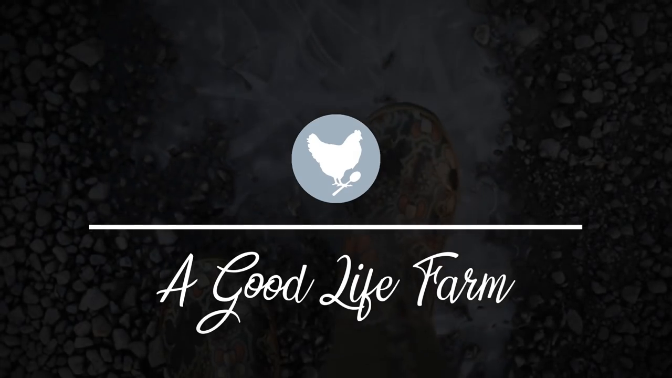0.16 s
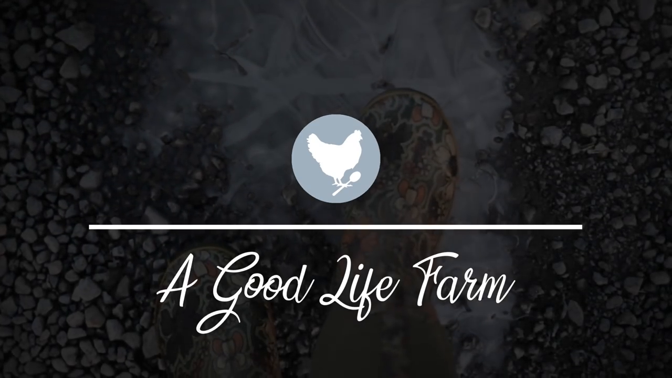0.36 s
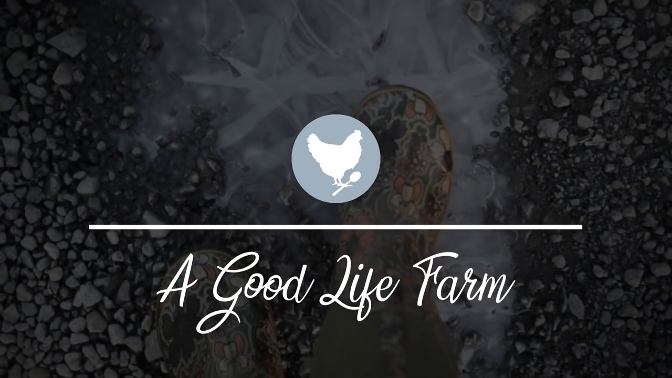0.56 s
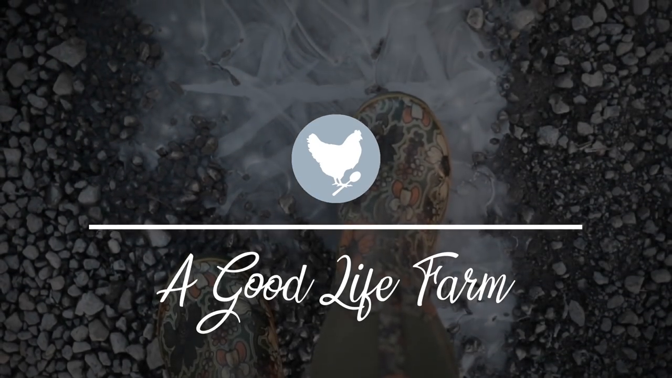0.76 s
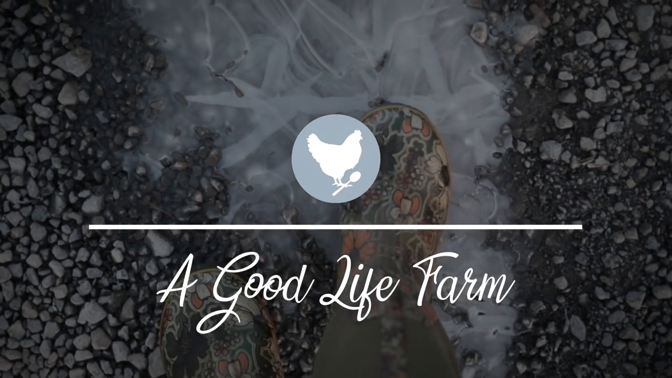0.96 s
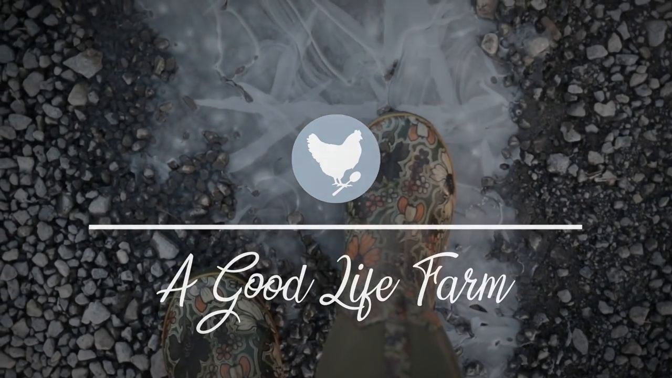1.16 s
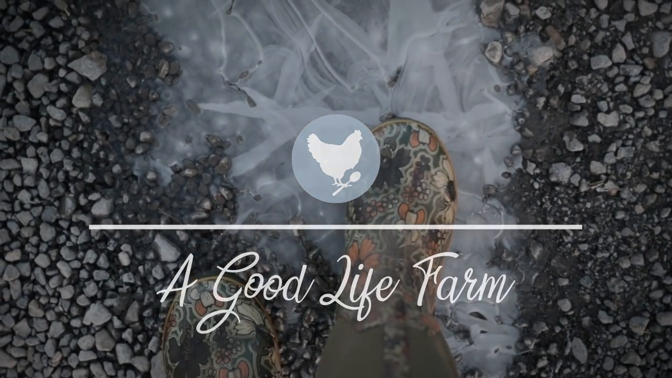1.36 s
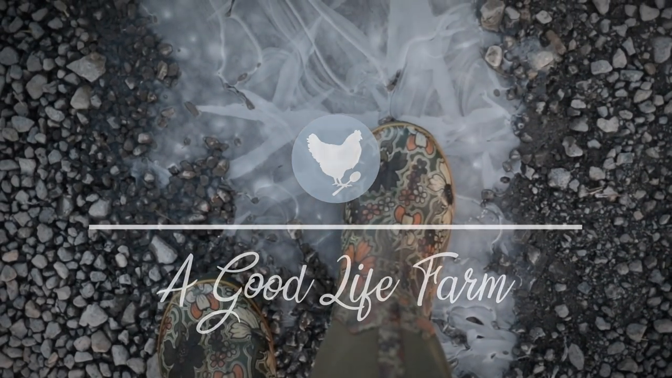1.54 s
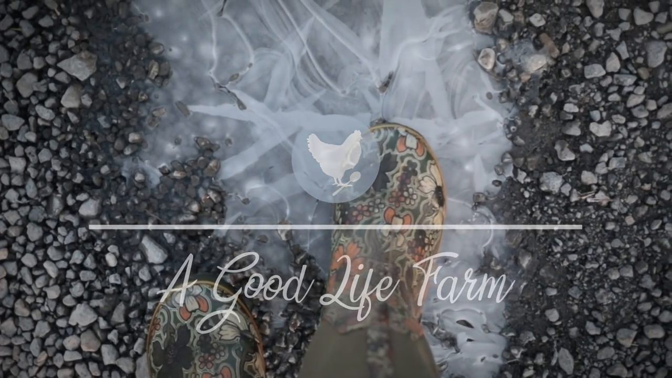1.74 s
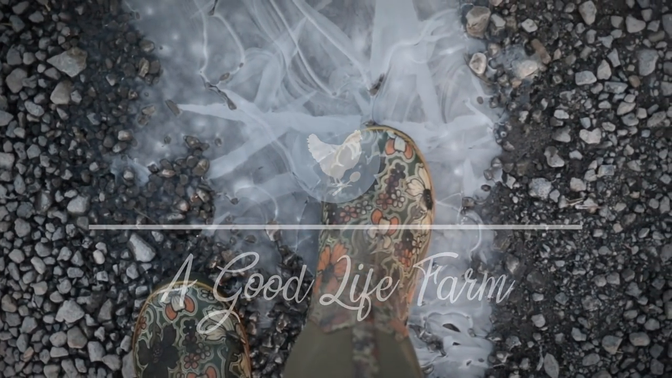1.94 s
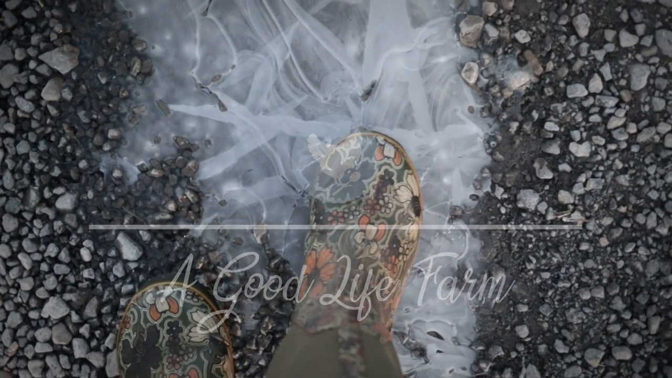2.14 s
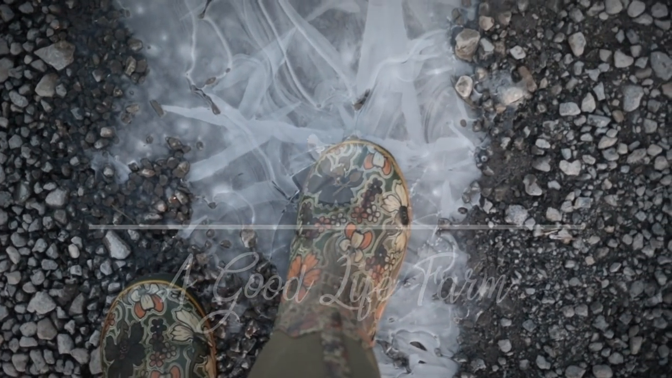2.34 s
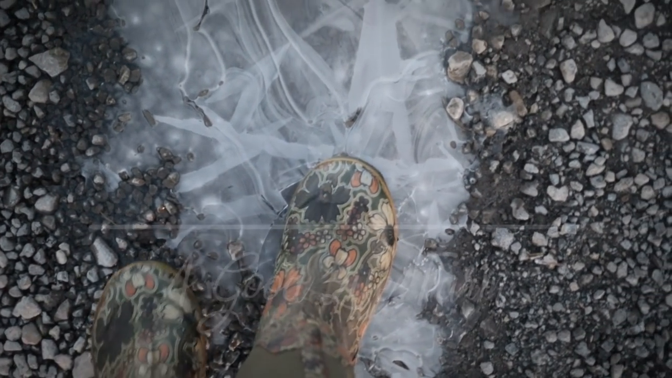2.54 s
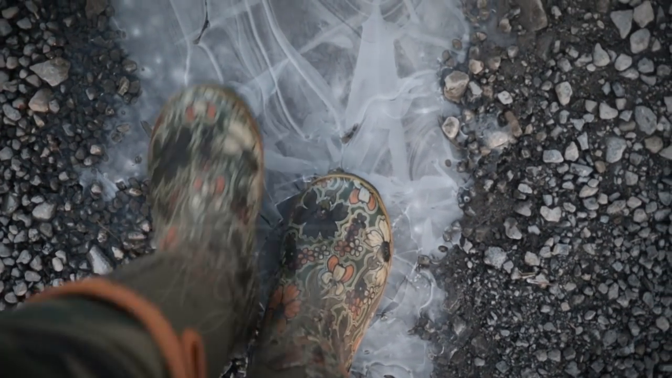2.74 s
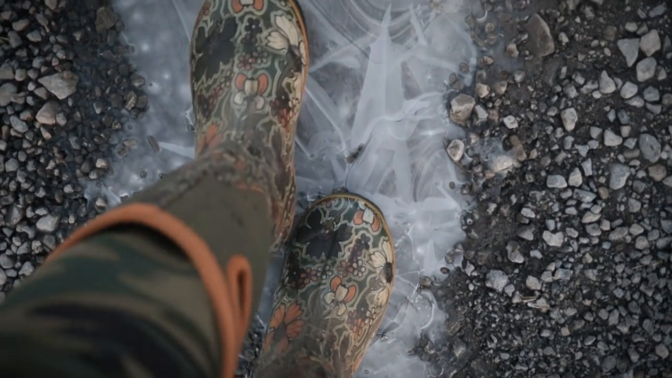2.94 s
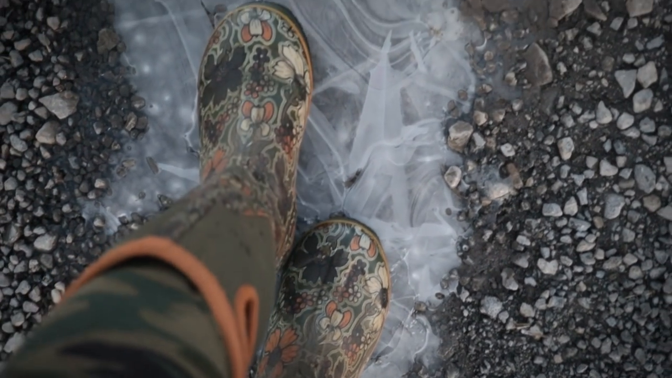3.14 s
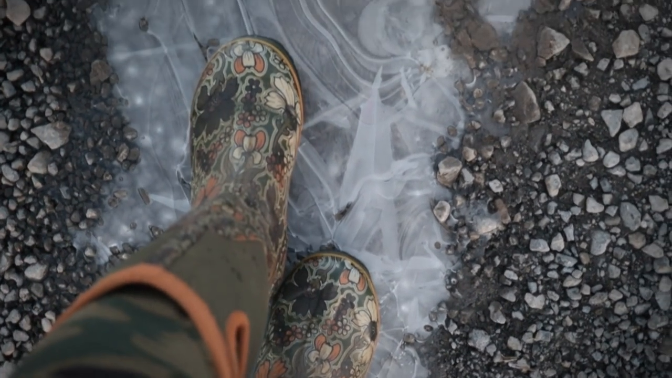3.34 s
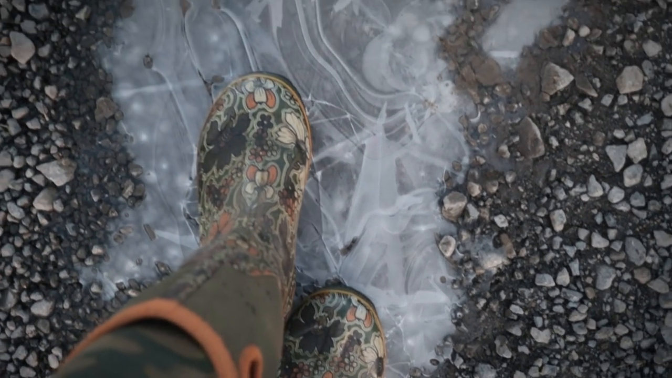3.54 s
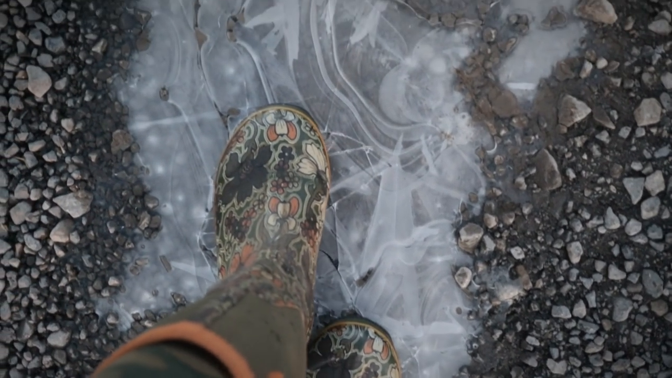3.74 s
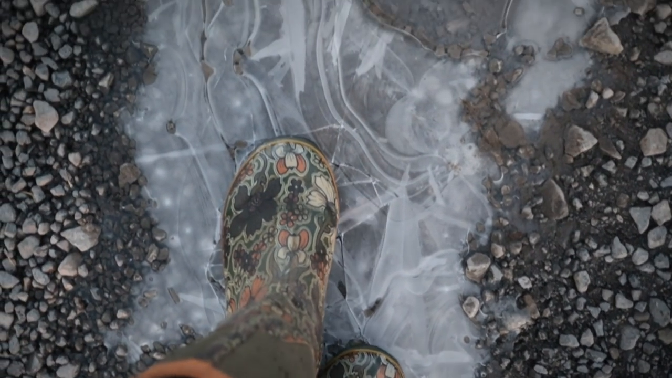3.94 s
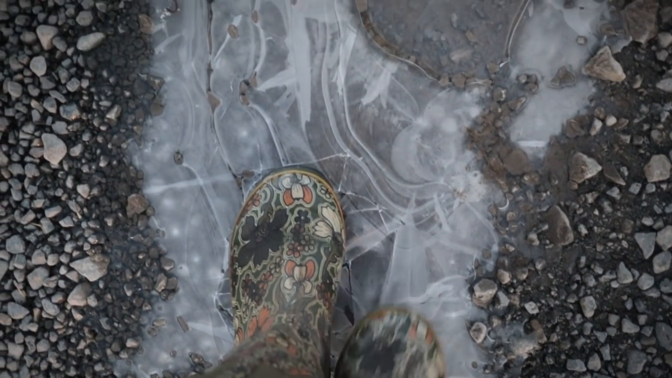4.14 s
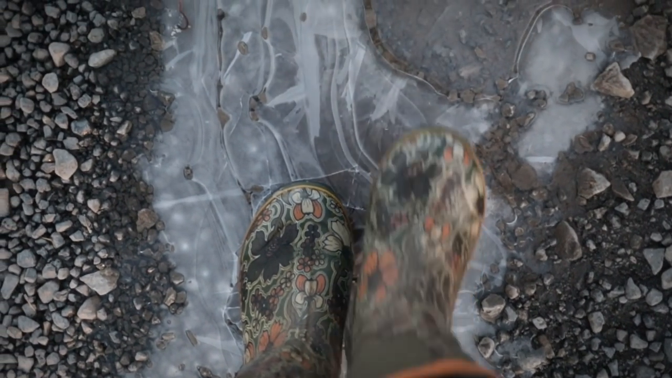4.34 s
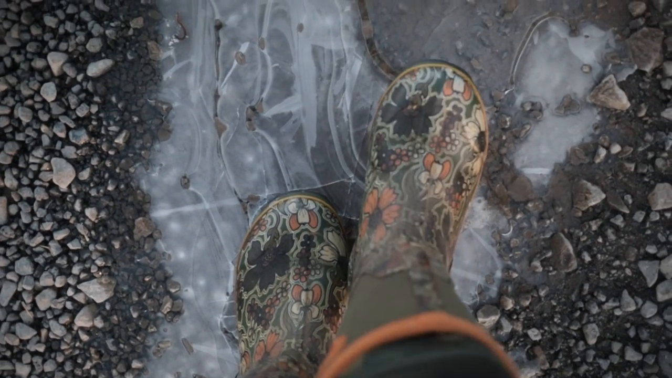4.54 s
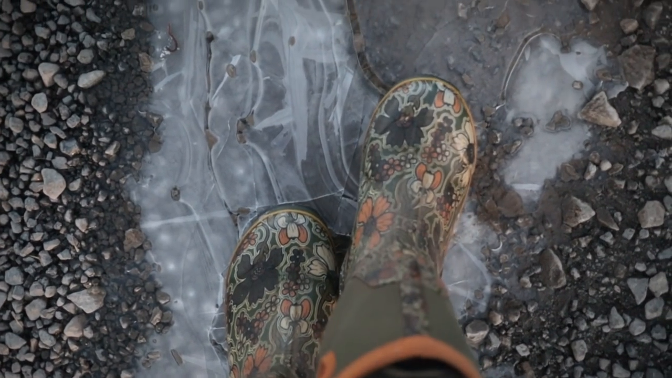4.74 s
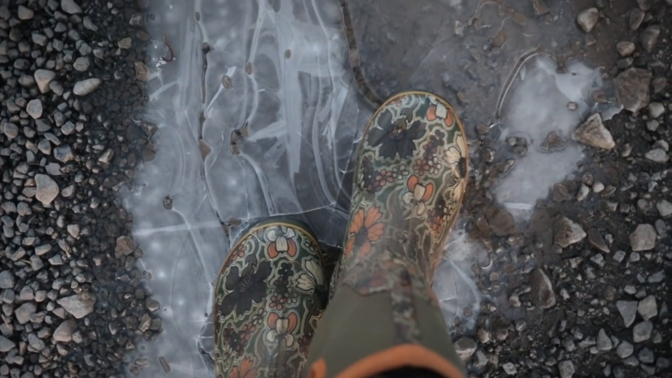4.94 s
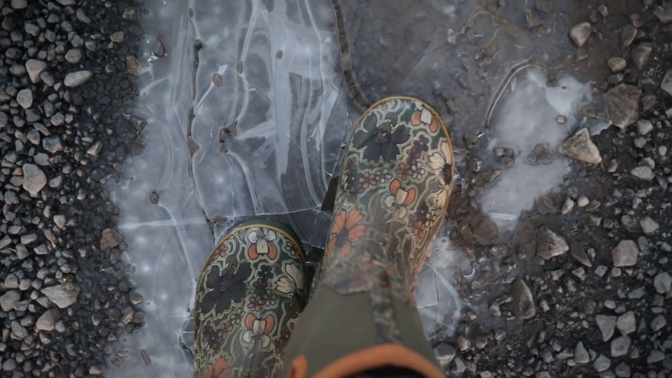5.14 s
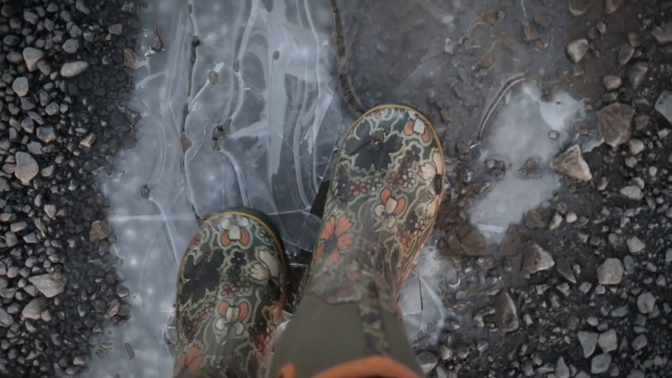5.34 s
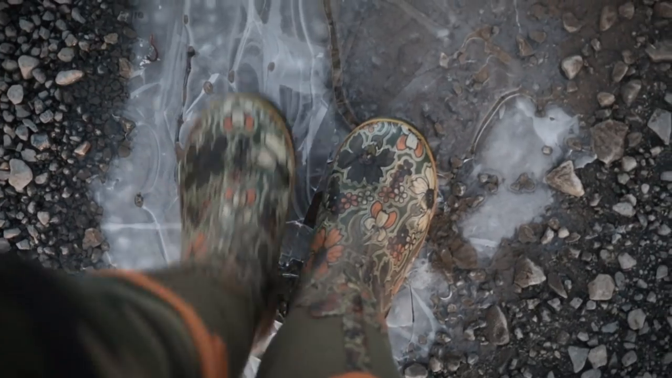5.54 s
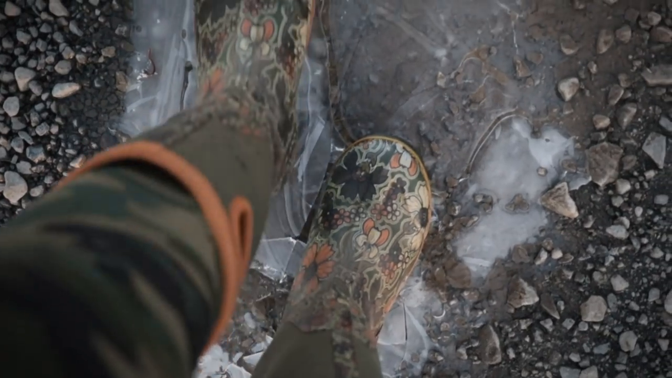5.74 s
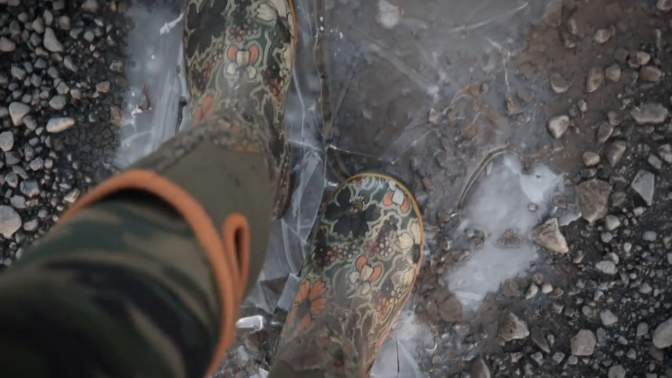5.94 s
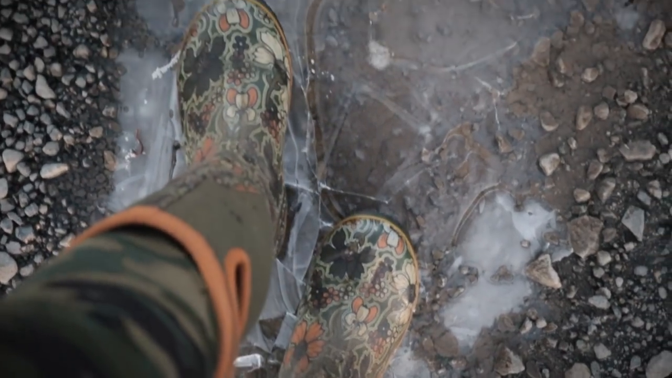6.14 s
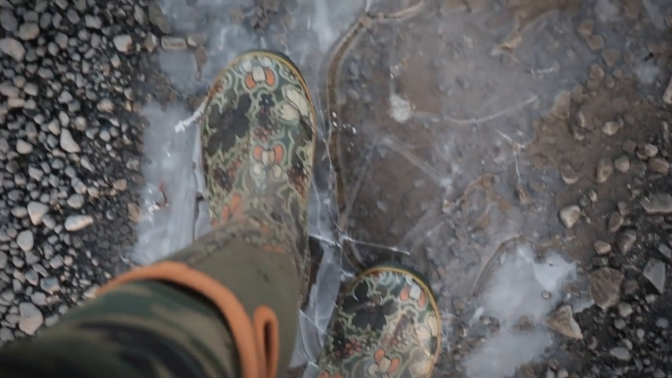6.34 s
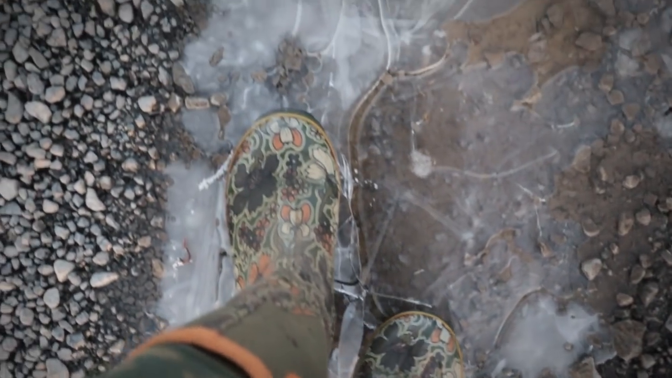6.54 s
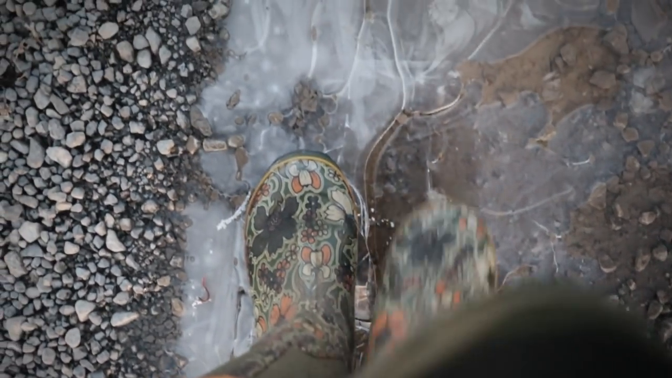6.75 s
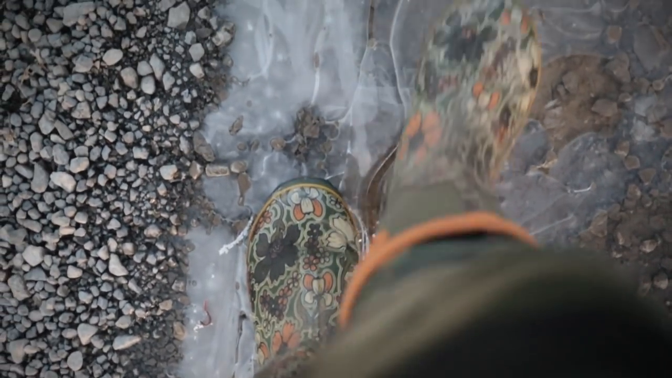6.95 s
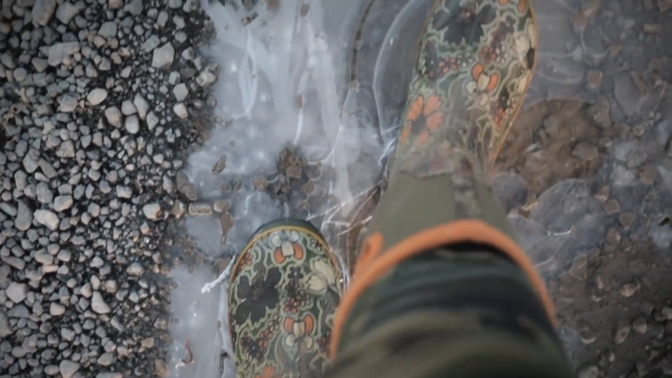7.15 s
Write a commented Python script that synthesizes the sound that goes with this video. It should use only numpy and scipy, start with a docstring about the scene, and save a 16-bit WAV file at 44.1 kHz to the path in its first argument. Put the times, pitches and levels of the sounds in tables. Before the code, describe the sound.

Quiet outdoor air with low rumble and faint hiss, a tiny thin whistle and a soft footfall jolt open the scene. From 0.3 s a rubber boot presses thin puddle ice: dense, bright, dry cracks over grainy crunching, strongest until 1.1 s, with brief sole scrapes, then thinning. Around 1.6 s the sheet gives way with hollower knocks and snaps, crackling on to 2.9 s. After a short gap, a hard crack at 3.1 s leads into the heaviest crunch, a rush of shards peaking near 3.45 s, fading into scattered snaps by 4.2 s. Another step crunches from 4.65 to 5.1 s, then only faint crumbling and a weak thin tone until 5.7 s. Breaks from 5.7 to 6.5 s sound glassy and brittle; sparse ticks and low thumps follow, and a sharp hollow crunch lands at 7.15 s, cut off at the end. Close and dry, the loudest cracks clipping.

```python
"""A frozen puddle over gravel, in quiet outdoor air: rubber boots step slowly on its thin ice.
Each sharp crack is a decaying plate ring in a noise burst, with a bright snap and a thud of the hollow beneath.
Cave-ins and pressing soles crumble the sheet: random small shards over a bed of grainy noise.
Under it lie rumble and hiss, two faint thin whistles (gliding sines), low jolts of the footfalls
and scrapes of the sole (band-shaped grainy noise); the loudest cracks clip."""
import sys
import numpy as np
from scipy import signal
from scipy.fft import rfft, irfft, next_fast_len
from scipy.io import wavfile
from scipy.ndimage import uniform_filter1d, map_coordinates

SR = 44100
rng = np.random.default_rng(int(sys.argv[2]) if len(sys.argv) > 2 else 0)


def volts(x):
    """Linear amplitude factor 10**(x/20) for a level x in dB, scalar or array-like."""
    e = np.asarray(x, float) / 20
    return 10 ** e


def transcribe(u):
    """Save the signal u as a 16-bit wav file named by the first command-line argument.

    u: samples, shape (n,) or (channels, n), limited to [-1, 1]; the rate is SR.
    q: integer samples, one column per channel.
    """
    v = np.clip(np.atleast_2d(u).T, -1, 1)
    q = np.round(v * 32767).astype(np.int16)
    wavfile.write(sys.argv[1], SR, q)


N = 317079


def unit(x):
    """Brings each row to rms 1."""
    return x / np.sqrt(np.mean(x ** 2, axis=-1, keepdims=True) + 1e-20)


def curves(rows):
    """Draws one value per sample for each column after the time."""
    s, *columns = np.transpose(rows)
    return [np.interp(np.arange(N) / SR, s, column) for column in columns]


def noise(spectrum):
    """Noise of rms 1, coloured by (frequency [Hz], density [dB per Hz]) points on a log axis."""
    m = next_fast_len(N)
    hz, db = np.transpose(spectrum)
    log_hz = np.log(np.fft.rfftfreq(m, 1 / SR) + 1)
    gain = volts(np.interp(log_hz, np.log(hz), db))
    return unit(irfft(rfft(rng.standard_normal(m)) * gain, m)[:N])


def grainy(x):
    """Breaks a steady noise into splinters a few milliseconds long by a random flutter of its level."""
    flutter_db = 3.5 * unit(uniform_filter1d(rng.standard_normal(N), size=90))
    return unit(x * volts(flutter_db))


# colour of the outdoor air: (frequency [Hz], density [dB per Hz])
AIR_COLOUR = [(30, -13), (145, 0), (245, -8.5), (300, -17), (1200, -21.5), (2200, -30.5), (16000, -43)]
# loudness of the air: (time [s], rms level [dB])
AIR_LEVEL = [(0, -46.5), (1.5, -56), (4.3, -57.5), (7.19, -64)]


def air():
    """Outdoor rumble and hiss: one coloured noise on a slow level curve."""
    return volts(curves(AIR_LEVEL)[0]) * noise(AIR_COLOUR)


# faint whistles, before their wavering:
# (start [s], end [s], start pitch [Hz], end pitch [Hz], start level [dB], loss by the end [dB])
WHISTLE_CUES = [(.145, .29, 3080, 3400, -60, 10), (5.46, 5.67, 875, 868, -48.5, 2)]


def whistles():
    """Thin gliding sines whose pitch and level waver together."""
    out = np.zeros(N)
    for start, end, from_hz, to_hz, db, loss_db in WHISTLE_CUES:
        n = round((end - start) * SR)
        waver = map_coordinates(rng.standard_normal(12), [np.linspace(0, 9, n)])
        glide = np.linspace(0, 1, n) ** 0.7  # moves fastest at the start
        hz = (from_hz + (to_hz - from_hz) * glide) * (1 + 0.003 * waver)
        level = volts(db - np.linspace(0, loss_db, n) + 2.7 * waver)
        tone = np.sin(2 * np.pi * np.cumsum(hz) / SR)
        out[round(start * SR):][:n] += level * signal.windows.tukey(n, 0.15) * tone
    return out


# footfalls and shifts of weight shake the ground: (time [s], level before the fade [dB])
JOLT_CUES = [(0.256, -42), (6.332, -37), (7.109, -36.5)]
# colour of their scuff: (frequency [Hz], density [dB per Hz])
SCUFF_COLOUR = [(60, -9), (130, 1), (400, -1), (900, -5), (2000, -53)]
JOLT_HZ, JOLT_T60_S = 89.5, 0.089
SCUFF_DB = 9.5  # rms of the scuff over the peak of the sine push


def jolts():
    """Low sine pushes with a dull noise scuff, both dying away together."""
    out = np.zeros(N + SR)
    t = np.arange(SR // 4) / SR
    scuff = np.pad(noise(SCUFF_COLOUR), (0, SR))
    for s, db in JOLT_CUES:
        at = round(s * SR)
        push = np.sin(2 * np.pi * JOLT_HZ * t) + volts(SCUFF_DB) * scuff[at:][:len(t)]
        envelope = volts(db - 60 * t / JOLT_T60_S) * (1 - np.exp(-t / 0.00088))
        out[at:][:len(t)] += envelope * push
    low_cut = signal.butter(2, 55, "highpass", fs=SR, output="sos")
    return signal.sosfilt(low_cut, out[:N])


# the rubber sole slides over ice and wet grit:
# (start [s], end [s], rms level before swell and low cut [dB], loudest pitch [Hz])
SCRAPE_CUES = [(0.726, 0.809, -27, 1250), (0.964, 1.062, -27, 2180), (1.064, 1.324, -37.5, 2320),
               (1.29, 1.475, -43, 6300), (2.523, 2.604, -32.5, 1410), (3.77, 3.928, -35.5, 1180),
               (5.214, 5.452, -42.5, 1410), (6.11, 6.284, -42.5, 3150)]
RASP_OCTAVES, SING_OCTAVES = 1.69, 0.14  # reach of each band to either side of the loudest pitch
SING_DB = -3  # spectral gain of the narrow singing band against the rasp


def scrapes():
    """Rasps: a broad band of gritty noise with a narrow band singing on top."""
    out, grit = np.zeros(N), grainy(rng.standard_normal(N))
    for start, end, db, loudest_hz in SCRAPE_CUES:
        span = slice(round(start * SR), round(end * SR))
        piece = grit[span]
        n = len(piece)
        octaves = np.log2((np.fft.rfftfreq(n, 1 / SR) + 1) / loudest_hz)
        rasp = 1 / (1 + (octaves / RASP_OCTAVES) ** 4)
        sing = volts(SING_DB) * np.exp(-(octaves / SING_OCTAVES) ** 2)
        band = unit(irfft(rfft(piece) * (rasp + sing), n))
        swell = signal.windows.tukey(n, 0.35)  # share of the length spent swelling and fading
        out[span] += volts(db) * swell * band
    return out


# a sole presses, rolls or drags and the ice crumbles steadily:
# (start [s], end [s], crunch load at start [dB], crunch load at end [dB])
PRESS_CUES = [(0.334, 1.026, -46.5, -28), (1.077, 1.57, -39, -49.5), (1.603, 2.005, -43, -34),
              (2.059, 2.382, -35, -28), (2.403, 2.693, -40.5, -45.5), (2.728, 2.938, -29, -44.5),
              (3.15, 3.664, -30.5, -28.5), (3.72, 4.079, -31.5, -32.5), (4.101, 4.233, -39, -56),
              (4.358, 4.628, -39.5, -46.5), (4.67, 5.066, -27.5, -27), (5.087, 5.454, -37.5, -46),
              (5.48, 5.825, -52, -43), (5.9, 6.554, -34, -37), (6.62, 6.872, -32, -54.5),
              (6.86, 7.15, -59, -53)]
# the sheet caves in with a rush of shards: (time [s], crunch load [dB])
CAVE_IN_CUES = [(1.64, -26), (3.144, -28.5), (3.437, -13), (3.616, -19), (4.658, -20.5), (5.902, -18.5),
                (7.165, -24)]
PRESS_EDGE_DB_PER_S = 610  # how fast a press sets in and lets go
CAVE_RISE_DB_PER_S, CAVE_FALL_DB_PER_S = 630, 476
STILL_DB = -60  # faint settling from the first press onward
CRUMBS_DB, CRUMBS_T60_S = -11, 0.028  # crumbs shed after every crack, against its cued peak


def crunch():
    """Levels in dB: the load of presses and cave-ins, and that load with the crumbs after each crack."""
    t = np.arange(N) / SR
    load = volts(2 * STILL_DB) * (t > PRESS_CUES[0][0]) + 1e-9  # powers add up
    for start, end, from_db, to_db in PRESS_CUES:
        outside = np.maximum(np.maximum(start - t, t - end), 0)
        press_db = np.interp(t, [start, end], [from_db, to_db]) - PRESS_EDGE_DB_PER_S * outside
        load = load + volts(2 * press_db)
    for s, db in CAVE_IN_CUES:
        drop_db = np.maximum(CAVE_RISE_DB_PER_S * (s - t), CAVE_FALL_DB_PER_S * (t - s))
        load = load + volts(2 * (db - drop_db))
    at = [round(cue[0] * SR) for cue in CRACK_CUES]
    breaks = np.bincount(at, [volts(2 * (cue[1] + CRUMBS_DB)) for cue in CRACK_CUES], N)
    crumbs = signal.lfilter([1], [1, -volts(-2 * 60 / (CRUMBS_T60_S * SR))], breaks)
    return 10 * np.log10([load, load + crumbs])


# colours of broken ice, its body, bright snap and hollow below: (frequency [Hz], density [dB per Hz])
BODY_COLOUR = [(350, -10.5), (700, 3.5), (2300, -3.5), (4000, -4), (5000, -9.5), (8000, -26)]
SNAP_COLOUR = [(3000, 2), (4600, -2.5), (8000, -3.5), (16000, -13.5)]
HOLLOW_COLOUR = [(100, -32), (280, -3), (500, 5.5), (1000, -29)]
HOLLOW_HZ = 411.6  # middle pitch of the air pocket under the sheet


def snaps(s, db, ring_hz, thud_db, snap_db, t60, tone, size):
    """Fractures: a few cycles of plate ring in a noise burst, a bright snap and a thud of the hollow."""
    t = np.arange(size) / SR
    luck = rng.random((len(s), 5))
    life = t60 * (0.85 + 0.62 * luck[:, :1])
    pitch = ring_hz[:, None]

    def fade(share, rise):
        """Quick rise, then a 60 dB fall over a share of the life."""
        return volts(-60 * t / (share * life)) * (1 - np.exp(-t / rise))

    def piece(spectrum, k):
        """A random cut of coloured noise for each fracture."""
        start = (luck[:, k, None] * (N - size)).astype(int)
        return noise(spectrum)[start + np.arange(size)]

    def first(x):
        """Sets the level over the first 6 ms."""
        return x / np.sqrt(np.sum(x ** 2, axis=1, keepdims=True) / 270)

    ring_share = 0.47 * (1500 / pitch) ** 0.88  # low plates ring longer
    ring = first(np.sin(2 * np.pi * pitch * t) * fade(ring_share, 0.00035))
    octaves = np.log2((np.fft.rfftfreq(size, 1 / SR) + 1) / pitch)
    favour = 0.55 + np.exp(-(octaves / 0.5) ** 2)  # the plate favours its own pitch
    shiver = irfft(rfft(piece(BODY_COLOUR, 1)) * favour, size)
    burst = first(shiver * (fade(1.68, 0.00012) + 1.35 * fade(0.48, 0.00011)))
    body = first(tone * ring + burst)
    snap = first(piece(SNAP_COLOUR, 2) * fade(0.93, 0.000097))
    low_hz = HOLLOW_HZ * np.exp(0.64 * (luck[:, 3:4] - 0.5))  # each break spans another width of hollow
    boom = np.sin(2 * np.pi * low_hz * t) * fade(1.13, 0.002)
    thud = first(boom + 1.3 * piece(HOLLOW_COLOUR, 4) * fade(0.74, 0.0015))
    mix = body + volts(snap_db)[:, None] * snap + volts(thud_db)[:, None] * thud
    sound = volts(db)[:, None] * mix
    at = np.round(s * SR).astype(int)[:, None] + np.arange(size)
    return np.bincount(at.ravel(), sound.ravel(), N + size)[:N]


# the patch of ice underfoot:
# (time [s], hollow against crunch [dB], brittleness added to snap and fizz [dB])
ICE_PATCH = [(.4, -12, 2.5), (.8, -14, -2), (1.3, -18, -1.5), (1.7, -2, 2.5), (2.5, -9, -0.5),
             (3.5, -1, -1), (4.1, -13, 0), (4.7, -3.5, -0.5), (5.3, -15.5, 1), (5.9, -3.5, 0),
             (6.2, -13.5, -5), (6.7, -5.5, -2)]
SHARD_HZ = 1600  # middle pitch of a loose shard
FIZZ_DB, FIZZ_SHRINKS = -2, 0.22  # against the crunch; dB lost per dB of crunch: light crumbling is brighter


def shards(count=1500):
    """Small random breaks, mostly tiny and a few large, on a bed of grinding grit."""
    load_db, crunch_db = crunch()
    hollow_db, brittle_db = curves(ICE_PATCH)
    luck = rng.random((count, 5))
    s = luck[:, 0] * (N - 1) / SR
    at = (s * SR).astype(int)
    db = load_db[at] - 7.0 - 4.8 * np.log(1 - 0.95 * luck[:, 1])
    ring_hz = SHARD_HZ * np.exp(1.34 * (luck[:, 2] - 0.5))
    thud_db = hollow_db[at] + 10 * (luck[:, 3] - 0.5)
    snap_db = brittle_db[at] - 13.0 + 11 * luck[:, 4]
    bits = snaps(s, db, ring_hz, thud_db, snap_db, t60=0.011, tone=0.43, size=1024)
    fizz_db = FIZZ_DB + brittle_db - FIZZ_SHRINKS * (crunch_db - np.median(crunch_db))
    fizz = volts(fizz_db) * noise(SNAP_COLOUR)
    hollow = volts(hollow_db) * noise(HOLLOW_COLOUR)
    grit = noise(BODY_COLOUR) + fizz + hollow
    return bits + volts(crunch_db - 1.5) * grainy(grit)


# the clear cracks:
# (time [s], nominal peak before low cut and clipping [dB], plate ring [Hz], ring over noise burst [dB])
CRACK_CUES = [(0.312, -20.5, 1260, -4), (0.328, -16.5, 2210, 19), (0.34, 0.0, 4130, 21),
              (0.374, 1, 900, -7), (0.4035, -6.5, 2180, 17), (0.439, -11.5, 2070, -2),
              (0.45, -10.5, 1200, 4), (0.473, -10, 905, 4), (0.491, 5.5, 4440, -18), (0.506, -15, 2030, 2),
              (0.517, 0.5, 860, 4), (0.553, -5, 1170, -2), (0.59, 0.5, 2380, -20), (0.63, -12, 1930, 1),
              (0.641, -5, 1980, 0), (0.656, -8, 935, 6), (0.668, -6.5, 980, -31), (0.693, -1.5, 1080, -24),
              (0.717, 0.5, 1010, -4), (0.747, 0, 1070, 1), (0.755, -5, 960, -6), (0.81, -9, 1200, 4),
              (0.819, -8.5, 1250, -9), (0.832, -5.5, 1600, 6), (0.847, -1, 1290, -5),
              (0.857, 3.5, 2480, -1), (0.872, -1.5, 2700, -11), (0.89, 0.5, 1370, -6), (0.895, -8, 970, 18),
              (0.901, -3, 1720, 2), (0.913, -2, 1530, -2), (0.929, 2.5, 2210, -4.5), (0.953, -20, 2070, 9),
              (0.976, -10, 1730, 10), (0.997, -6, 2080, 4), (1.025, -6.5, 2230, 12), (1.039, -7, 2470, 0),
              (1.063, 2.5, 1670, 5), (1.086, -5, 1600, 2), (1.119, -9.5, 1500, 3), (1.233, -9, 3130, -18),
              (1.259, -20, 8500, -5), (1.274, -11, 3200, -24), (1.299, -6.5, 1900, -9),
              (1.333, -14.5, 3600, 21), (1.389, -14, 650, 1), (1.572, -13.5, 650, 15), (1.584, 5, 680, -18),
              (1.616, -8, 990, -4), (1.631, 1, 3460, -10), (1.641, 0, 3220, 4), (1.7, 2, 401, 3.5),
              (1.722, -9, 706, -23), (1.759, -13.5, 2670, 7), (1.841, -1.5, 476, -14),
              (1.903, -6, 396, 0.5), (1.932, -9, 513, -1), (1.956, 4, 580, -16), (1.988, 4, 414, 3),
              (1.997, -1.5, 3950, -7), (2.002, -1.5, 1420, 1), (2.058, -14, 1640, -9), (2.081, -1, 396, 3),
              (2.096, -6.5, 2260, -16), (2.129, -3.5, 1110, 2.5), (2.142, -9, 1000, -2),
              (2.167, -5, 2500, -9), (2.198, -2.5, 1530, 4), (2.209, -9, 3380, 10), (2.219, -0.5, 550, 0),
              (2.26, -8.5, 3340, -18), (2.291, -2, 3600, -23), (2.344, -3, 3500, -8),
              (2.356, -5, 1050, -25), (2.371, -12, 1590, 16), (2.442, 0, 690, -4), (2.512, -10, 1220, 13),
              (2.64, -19.5, 1860, 13), (2.7, -13, 1750, 20), (2.723, -10.5, 670, -10), (2.733, -5, 1170, 0),
              (2.748, 3.5, 1165, 32), (2.802, -7.5, 990, 14), (2.881, -7, 1240, 6), (2.917, -14, 2310, -8),
              (3.135, 9, 620, -24), (3.15, 3.5, 388, -10), (3.182, 0, 760, -9), (3.191, 0.5, 950, -14),
              (3.202, -5, 970, 5), (3.249, -6.5, 1690, -23), (3.276, -8, 1660, -1),
              (3.325, -13.5, 1500, -5), (3.337, -6.5, 1060, -9), (3.36, -1, 1130, -21),
              (3.373, -0.5, 1120, -9), (3.392, 0, 2610, -3), (3.403, -2.5, 1930, 3), (3.426, 2, 760, -7),
              (3.438, -3, 1900, 11), (3.469, -4, 685, -12), (3.511, -2.5, 790, -10), (3.538, 3, 1060, -9),
              (3.579, -2.5, 1110, -4), (3.591, 0, 1070, -10), (3.608, -6, 886, 3), (3.652, -10, 500, 11),
              (3.67, -7, 1130, -8), (3.724, -6, 3490, -9), (3.758, -4.5, 3800, -18), (3.809, 2.5, 600, 8),
              (3.848, 0, 690, -4), (3.985, -8, 1180, 19), (4.001, -16, 846, 14), (4.033, -10, 890, 14),
              (4.076, -4, 1350, 9), (4.198, -8.5, 1190, 26), (4.382, -6, 2370, 1.5), (4.416, -10.5, 620, 4),
              (4.501, -21, 950, -3), (4.534, -21, 600, -16), (4.656, 1.5, 1040, 6), (4.696, 0, 1070, 1),
              (4.768, -12, 1070, 9), (4.801, -6, 1480, -1), (4.849, -1.5, 500, 2), (4.87, -4.5, 1250, -12),
              (4.886, 0, 1030, 10), (4.917, -8, 1550, -5), (4.958, -1.5, 2090, -5), (4.967, 0, 1170, 4),
              (5.042, -6.5, 2480, 20), (5.062, -2, 4050, 5), (5.151, -13.5, 1070, -2.5),
              (5.22, -30, 1100, 3), (5.316, -19.5, 1510, -3), (5.386, -22.5, 2670, 23),
              (5.515, -31, 2600, 0), (5.602, -25, 1950, 2), (5.629, -19.5, 630, -4),
              (5.673, -24.5, 1500, -15), (5.705, -1.5, 540, -18), (5.724, -12, 875, -8),
              (5.752, 6, 880, -10), (5.792, -13, 930, -18), (5.835, -8, 4000, -7), (5.89, 4, 816, -1),
              (5.897, -3, 1260, 0), (5.908, 0, 393, -7), (5.981, -6.5, 3370, -17), (6.01, -9, 570, -7),
              (6.042, -10.5, 2570, -12), (6.054, -1, 3420, -5), (6.075, -8, 1980, 8),
              (6.097, 0.5, 3800, -1), (6.111, 1, 2640, -20), (6.135, -14, 696, -1),
              (6.214, -17.5, 1230, -5), (6.299, -3.5, 1120, 6.5), (6.337, -2, 2940, -21),
              (6.435, 2, 1220, -22), (6.452, -1, 3800, 1), (6.484, -3.5, 3450, -2), (6.636, -23, 890, 2),
              (6.659, -13, 614, 0), (6.685, -8.5, 1340, 20), (6.754, -23, 3000, -8),
              (6.776, -11.5, 1170, -23), (6.829, -24, 1910, -13), (7.05, -31, 3000, -6),
              (7.151, 2, 507, -5), (7.16, 0.5, 510, 1), (7.17, 4.5, 630, -4), (7.181, -2, 784, 7)]
PEAK_OVER_BODY_DB = 12.5  # crest of a crack over its first milliseconds
# snap against the body: level at 1.5 kHz, rise as small high plates snap brighter, dB lost per dB of body
SNAP_DB, SNAP_DB_PER_OCTAVE, SNAP_SHRINKS = -5.5, 2.5, 0.056
# thud against the body: level at 1 kHz, tilt as wide low plates thud more, share of the hollow's dB
THUD_DB, THUD_DB_PER_OCTAVE, THUD_FOLLOWS = -5, -1.5, 0.57


def cracks():
    """The clear breaks of the sheet: each plate's pitch and patch set its snap and thud."""
    s, peak_db, ring_hz, ring_db = np.transpose(CRACK_CUES)
    at = (s * SR).astype(int)
    hollow_db, brittle_db = (curve[at] for curve in curves(ICE_PATCH))
    db = peak_db - PEAK_OVER_BODY_DB
    snap_db = SNAP_DB + brittle_db + SNAP_DB_PER_OCTAVE * np.log2(ring_hz / 1500)
    snap_db = snap_db - SNAP_SHRINKS * (db - db.mean())
    thud_db = THUD_DB + THUD_DB_PER_OCTAVE * np.log2(ring_hz / 1000) + THUD_FOLLOWS * hollow_db
    return snaps(s, db, ring_hz, thud_db, snap_db, t60=0.017, tone=volts(ring_db)[:, None], size=2600)


def scene():
    """Mixes all layers; the small microphone hears little of the ice's lowest push."""
    low_cut = signal.butter(3, 185, "highpass", fs=SR, output="sos")
    ice = signal.sosfilt(low_cut, cracks() + shards() + scrapes())
    return (ice + jolts() + whistles() + air())[None]


def band_limit(x):
    """A steep low-pass at the top of the band."""
    return signal.sosfilt(signal.butter(12, 16470, fs=SR, output="sos"), x)


def record(dry):
    """The loudest cracks flatten at full scale."""
    mix = np.clip(dry, -1, 1)
    return band_limit(mix)


dry = scene()
out = record(dry)
transcribe(out)
```